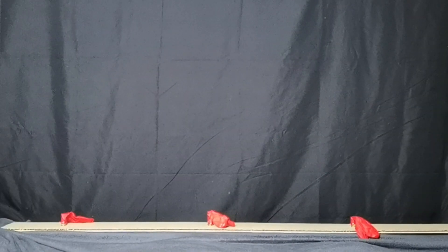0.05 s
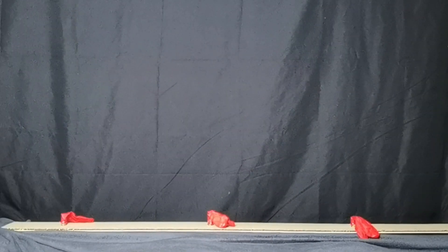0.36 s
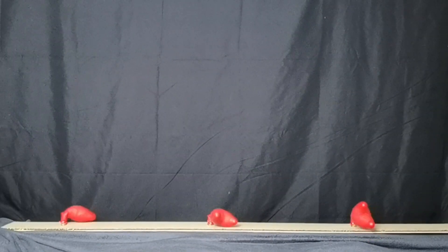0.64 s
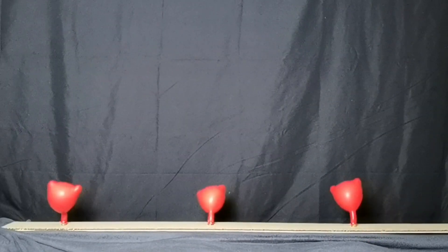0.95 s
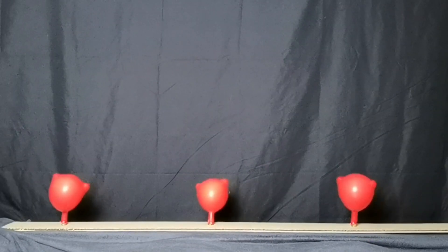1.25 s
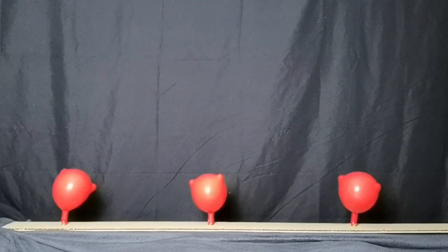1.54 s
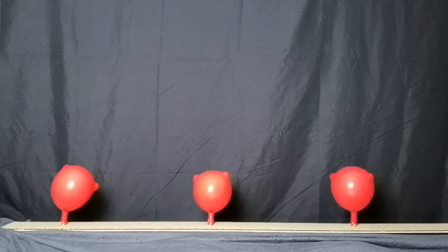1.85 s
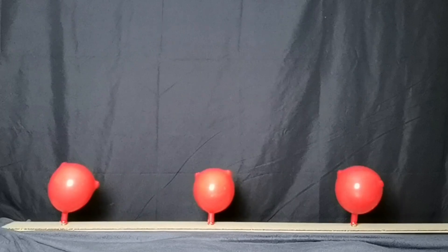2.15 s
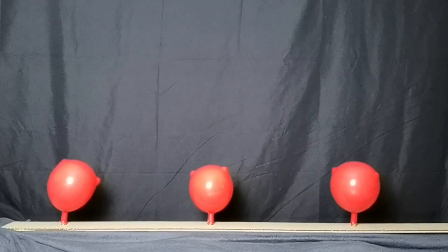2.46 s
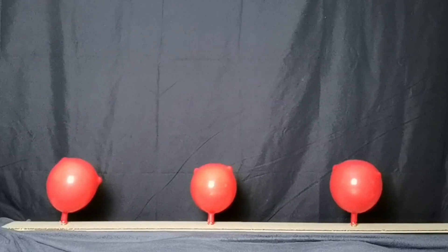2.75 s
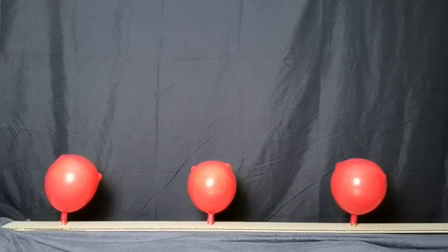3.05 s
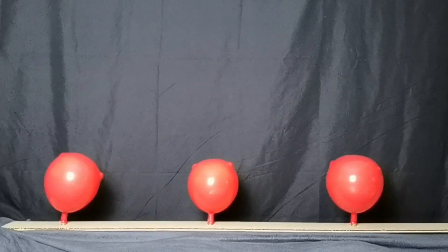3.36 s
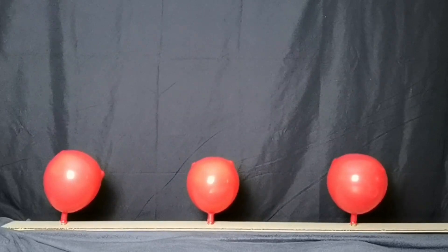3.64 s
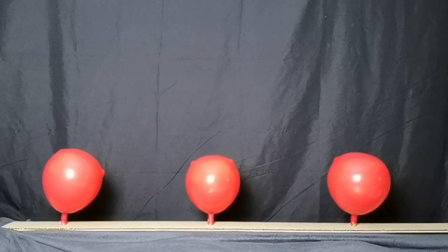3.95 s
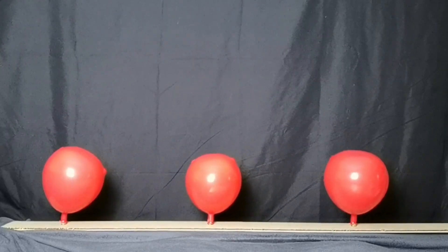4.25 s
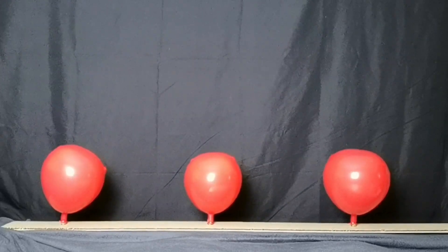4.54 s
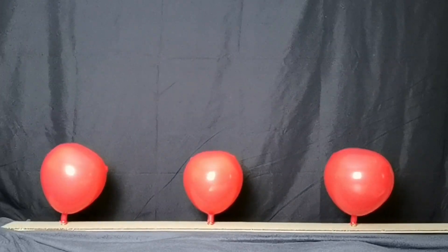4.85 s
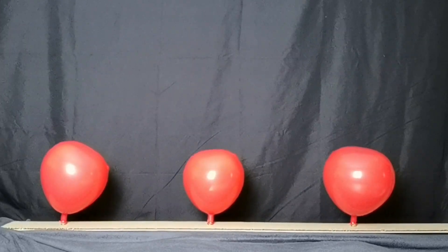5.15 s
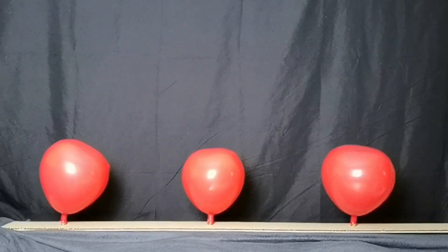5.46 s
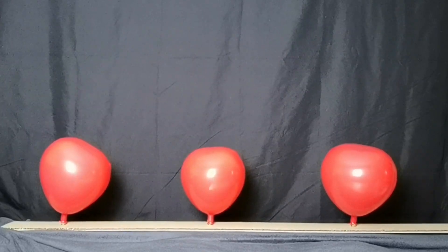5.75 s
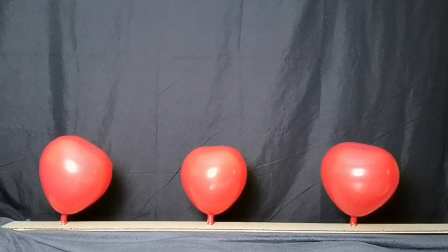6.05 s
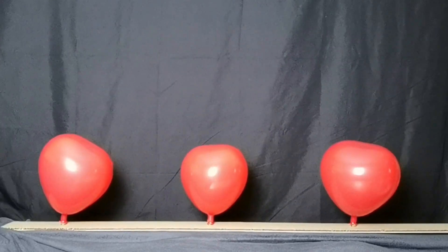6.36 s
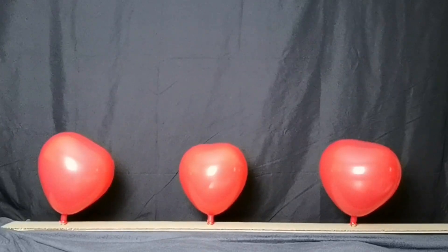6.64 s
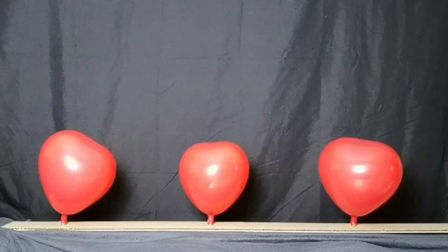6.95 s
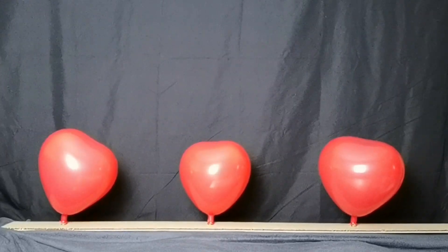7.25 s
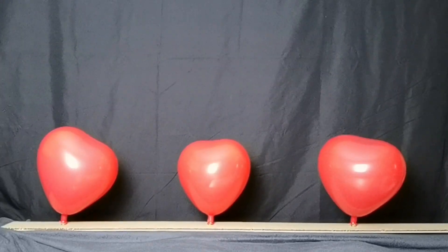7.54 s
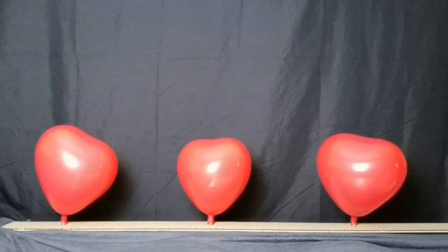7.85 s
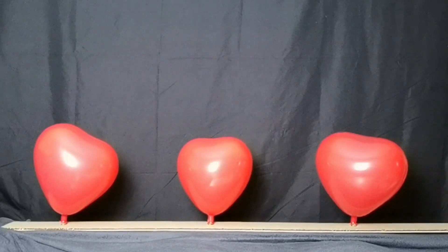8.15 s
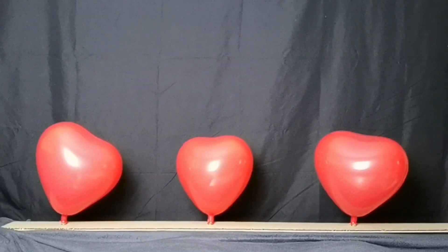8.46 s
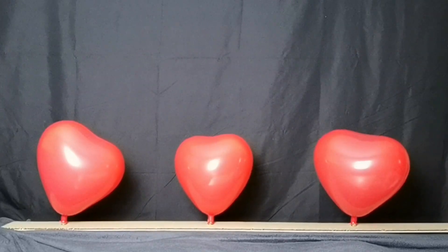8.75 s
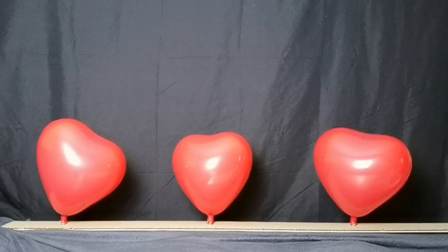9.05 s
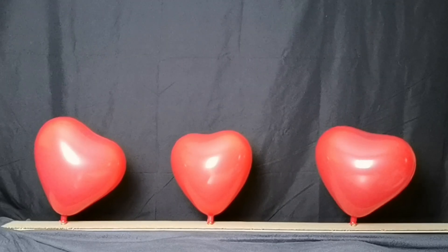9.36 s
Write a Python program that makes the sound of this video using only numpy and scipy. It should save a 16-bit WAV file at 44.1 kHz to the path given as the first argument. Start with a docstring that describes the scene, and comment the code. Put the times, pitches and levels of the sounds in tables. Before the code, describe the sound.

After a few light clicks, an electric air pump whines up to a steady pitch and fills three balloons with hissing air.

```python
"""An electric blower fills three balloons

After a few light clicks the switch snaps on, and the motor knocks, scrapes and runs up to a steady
whine over the hum of the mains. Air rushes through the housing and hisses out of three nozzles, each
singing a fuzzy note. The limp rubber crackles as it unfolds and thumps as it pulls taut in a quiet room."""
import sys
import numpy as np
from scipy import signal
from scipy.fft import rfft, irfft
from scipy.io import wavfile
from scipy.ndimage import uniform_filter1d

SR = 44100
rng = np.random.default_rng(int(sys.argv[2]) if len(sys.argv) > 2 else 0)


def generate_wav(sig):
    """Save sig (samples, or channels by samples) to the path in sys.argv[1] as 16-bit PCM at SR."""
    pcm = np.round(np.clip(np.atleast_2d(sig).T, -1, 1) * 32767).astype(np.int16)
    wavfile.write(sys.argv[1], SR, pcm)


N = 423360
TIME, FREQS = np.arange(N) / SR, np.fft.rfftfreq(N, 1 / SR)
SWITCH_ON_S, EAR_DELAY_S = 0.548, 22 / SR
SINCE_ON = np.maximum(TIME - SWITCH_ON_S, 0)

# narrow resonances (favoured pitches) of the hoses and nozzles: f/Hz, width/Hz, lift/dB
HOSE_PEAKS = [(493, 16, 4), (598, 20, 4.5), (675, 16, 2.5), (5410, 41, 2), (5624, 40, 4), (5895, 50, 3),
              (6010, 45, 3), (6235, 70, 4), (6420, 60, 2.5), (6530, 60, 2.5), (6730, 70, 1.5)]
HOSE_DB = sum(db / (1 + (2 * (FREQS - hz) / width) ** 2) for hz, width, db in HOSE_PEAKS)


def motor():
    """The spinning shaft sets the pitch of all the motor's tones, so they rise together."""
    speed = shaft_speed()
    unsteady = 1 + 0.000323 * wander(1.37) + 0.00022 * wander(4.5)
    angle = 2 * np.pi * np.cumsum(speed * unsteady) / SR
    lead = 2 * np.pi * speed * EAR_DELAY_S  # how far the left ear is ahead, in radians
    tones = whine(speed, angle, lead) + weak_tones(speed, angle, lead) + case_shake(speed, angle, lead)
    return (tones + brush_squeals(angle, lead)) * running()


def shaft_speed():
    """Turns per second: a quick kick at switch-on, a slower pull, then a creep as the motor warms."""
    # stages of the run-up: speed gained/Hz, time constant/s
    run_up = [(134.4, .0716), (212.2, .292), (4.45, 3)]
    return np.maximum(sum(gained * (1 - np.exp(-SINCE_ON / lag_s)) for gained, lag_s in run_up), 1)


def whine(speed, angle, lead):
    """The fan wheel makes four strong tones that swell and fade as they climb through resonances."""
    # each tone's order, meaning its cycles per turn of the shaft
    orders = [2, 4, 6, 14]
    # one row per order: left base level/dB, right base level/dB, growth/(dB per dB of speed),
    # twist (phase shift between the ears)/rad, waver/dB, roughness/rad
    fan_tones = [(-22, -22, 0.42, 0.03, 1.3, .038), (-39.5, -37, 1.5, -0.22, 1.7, 0.18),
                 (-34.5, -38, 3.7, 0.087, 1.2, .18), (-36, -44.5, 3.8, 0.2, 4, 0.85)]
    # each order drifts as the balloons grow: t/s, left lift/dB, right lift/dB, twist/rad
    drifts = {2: [(.8, 3.5, -0.5, -0.28), (1.05, 3, 3.5, -0.27), (1.22, 0, -3.5, 1.6),
              (1.43, 1, -0.5, -1.7), (1.56, -8, -4, 0.46), (1.75, 0.5, -0.5, 0.48),
              (1.97, -5.5, -4.5, 0.98), (2.15, 0, 2, 1.09), (3.4, -0.5, -1, 0.93), (3.55, -4.5, -4.5, 0.89),
              (3.8, 1, 0, 0.41), (4.2, -3.5, -0.5, 0.55), (4.55, -6, -2.5, 1.05), (4.85, 1.9, 0.5, 0.76),
              (6, 0.5, 1.5, 0.63), (7.5, -3, -3, 0.7), (8.2, 1.5, 1, 0.71), (9.1, 0.5, 0.5, 0.7)],
              4: [(1.1, 7, 4, -0.052), (1.18, 6, 4, -0.4), (1.24, 4, 3, 0.58), (1.3, 9, 3, 0.5),
              (1.35, 6, -1, -1.85), (1.42, 3.5, 5, -0.7), (1.55, 6, 1, -0.16), (1.9, 8.5, 2, -1.1),
              (2.3, -10, -5, -0.57), (2.9, -1, -0.5, 0.13), (3.75, -12, -9, -0.023), (4.55, -2, 1.5, 0.31),
              (5.6, -1, -1.5, 0.11), (7.3, -2, -3, 0.86), (7.75, -5, -3.5, 0.24), (8.3, 2.5, -0.5, 0.59),
              (9.4, -4, 0.5, -0.095)], 6: [(1.5, 0.5, 2, -0.4), (2, 1, 1, 1.5), (2.4, 4.3, 7.5, -0.1),
              (3.05, 5, 9, -0.6), (4.1, 2.5, 7, -0.1), (4.5, 3, -1, 0.6), (5.6, -3, -1, 0.7),
              (6.5, 2.5, 5.5, -1.1), (7.6, -1.5, -4, 1), (8.5, 3, -2, 0.7), (9.4, -0.5, 5, 1.7)],
              14: [(.95, -1, 4, -1.4), (1.12, -2, -4, -1.4), (1.23, 8, -3, -1.4), (1.32, -2, 5, -2),
              (1.6, 2, 5, -2), (2.5, -1.5, -3, -0.12)]}
    speed_db = 20 * np.log10(speed / speed[-1])
    out = np.zeros((2, N))
    for order, (left_db, right_db, growth, twist, waver_db, rough_rad) in zip(orders, fan_tones):
        hz = order * speed
        *drift_db, drift_twist = curve(drifts[order])
        ripple_db, ripple_twist = standing_waves(hz)
        level_db = np.array([[left_db], [right_db]]) + growth * speed_db
        level_db += resonance_db(hz) + ripple_db + drift_db
        ear_phase = order * lead + twist + drift_twist + ripple_twist
        radiated = 1 / (1 + (285 / hz) ** 12)  # the small case gives off no low tones
        out += radiated * tone(order * angle, level_db, ear_phase, waver_db, rough_rad)
    return out


def resonance_db(pitch):
    """The housing and the room boost some pitches and swallow others, differently at each ear."""
    # peaks and dips: f/Hz, half width/Hz, left lift/dB, right lift/dB
    peaks = [(322, 20, 4.5, 0), (359, 14, -15, -18), (390, 18, -2, -3), (439, 10, -4, -22),
             (468, 18, 5.5, -3), (496, 13, 6, 5), (510, 8, 5.5, -4), (526, 4, -7, 2), (539, 4, -19, -12),
             (552, 6, -16, -4), (567, 5, -7, -18), (578, 5, -0.5, -2), (590, 7, -12, -5), (600, 4, 3, -18),
             (615, 14, 2.5, 2.5), (647, 3, -4, 0), (656, 5, 4.5, -2), (665, 4.5, -11, -18), (930, 55, 5, 0),
             (1268, 40, 13.5, 12), (1306, 5, -8, -1), (1318, 4, -8, -7), (1338, 14, 7.5, 7),
             (1354, 2, -11, -7), (1363, 4, 5, 2), (1371, 3, -7, -3), (1790, 75, 5.5, 1), (1975, 50, -6, -5),
             (2058, 18, 6.5, 10.5), (4100, 90, 5, 5)]
    lifts = sum(np.outer([left, right], bump(pitch[::64], hz, width)) for hz, width, left, right in peaks)
    return np.array([np.interp(TIME, TIME[::64], lift) for lift in lifts])


def standing_waves(hz, depth_db=0.9, depth_rad=0.25, spacing_hz=14):
    """Standing waves ripple a rising tone's level and phase; the ripple ends near its final pitch."""
    steps = (hz[-1] - hz) / spacing_hz
    ripple = rng.standard_normal((3, 1024))
    ripple[:, :2] = 0
    left, right, twist = (np.interp(steps, np.arange(len(row)), row) for row in ripple)
    return depth_db * np.array([left, right]), depth_rad * twist


def weak_tones(speed, angle, lead):
    """Quieter tones grow with speed; those that are not whole orders come from the bearings."""
    # tones at full speed: order/(cycles per turn), left level/dB, right level/dB, twist/rad
    orders = [(3, -45.5, -47.5, -0.2), (4.78, -58, -54.5, 0), (5.22, -44.8, -45.6, 1.4),
              (6.78, -54, -54, 0), (8, -50.5, -46.8, -1.4), (10, -46.3, -46.5, 0.5)]
    out = np.zeros((2, N))
    for order, left_db, right_db, twist in orders:
        level_db = np.array([[left_db], [right_db]])
        out += tone(order * angle, level_db, order * lead + twist, waver_db=3.0, rough_rad=0.13)
    return out * (speed / speed[-1]) ** 3


def case_shake(speed, angle, lead, resonance_hz=212, half_width_hz=25, level_db=-43):
    """The slightly lopsided shaft shakes the case as its speed passes the case's resonance."""
    shake = tone(angle, level_db, lead, waver_db=2.0, rough_rad=0.3)
    return bump(speed, resonance_hz, half_width_hz) * shake


def brush_squeals(angle, lead, bars=24, fray_rad=1.3, right_db=-1.5):
    """The brushes, which feed current to the shaft, squeal briefly on its spinning contact bars."""
    # squeals: t/s, half length/s, level/dB
    squeals = [(.582, .011, -33), (.65, .01, -29.5), (.68, .013, -33)]
    phase = bars * angle + fray_rad * wander(240)
    squeal = tone(phase, np.array([[0], [right_db]]), bars * lead, waver_db=1.0, rough_rad=0.6)
    return reverberate(swells(squeals) * squeal * running(), t60=0.21, wet_db=-1)


def brush_rasp():
    """The brushes scrape and spark under the heavy starting current."""
    # tone colour of the scrape: f/Hz, relative level/dB
    colour = [(850, 0), (1050, -3), (1400, -5.5), (1800, 5), (2200, -14), (3200, -13), (4100, -11),
              (4800, 0)]
    # bursts of scraping: t/s, half length/s, level/dB
    bursts = [(0.573, 0.031, -40), (0.742, 0.069, -25.5), (0.927, 0.038, -43.5), (1.13, 0.22, -31.5)]
    scrape = evened(coloured(rng.standard_normal((2, N)), colour, skirt_db=41))
    flicker_db = 2 * wander(60) + [[0], [-2]]  # a little softer on the right
    return scrape * swells(bursts) * gain_of(flicker_db) * running()


def knock():
    """The motor kicks against its housing as the current comes on, and the shell rings briefly."""
    # kicks: t/s, level/dB
    kicks = [(0.5497, -35), (0.599, -39)]
    # ringing notes of the housing: f/Hz, relative level/dB, time to fade by 60 dB/s
    housing = [(293, -2, 0.09), (490, 1, 0.12), (934, -1, .13), (1810, -7, .06), (2132, -8, .06)]
    out = np.zeros((2, N))
    for start_s, db in kicks:
        part = out[:, round(start_s * SR):][:, :SR // 4]
        t = TIME[:part.shape[1]]
        for hz, note_db, t60 in housing:
            part += gain_of(db + note_db - 60 * t / t60) * np.sin(2 * np.pi * hz * t)
    return reverberate(out, t60=0.15, wet_db=-3)


def hum(hz=100, steady_db=-45.5, surge_db=10, surge_s=0.75):
    """The motor's iron hums at twice the mains frequency, louder while the starting current flows."""
    # the hum dips briefly: t/s, half length/s, level change/dB
    dips = [(0.62, 0.013, -19), (0.814, 0.068, -10)]
    dips_db = sum(db * bump(TIME, s, half_s) for s, half_s, db in dips)
    level_db = steady_db + surge_db * bump(SINCE_ON, 0, surge_s) + dips_db
    return tone(2 * np.pi * hz * TIME, level_db, np.zeros(N), waver_db=2.5, rough_rad=0.13) * running()


def airflow():
    """Moving air makes a low rumble, a middle rush and a high hiss."""
    # slow rise and fall of the low air noise: t/s, relative level/dB
    low_air = [(1.1, 0), (1.48, 1.5), (2.1, -4), (3, -5), (4, 1.5), (4.6, 1.5), (6.8, 0.5), (7.6, -5),
               (8.3, 1), (9.1, -7)]
    low_db = curve(low_air)[0]
    low_db -= np.median(low_db)
    return (rumble(low_db) + rush(low_db) + hiss()) * running()


def rumble(low_db):
    """The shaking case gives off a deep noise."""
    # tone colour: f/Hz, left base level/dB per Hz, right base level/dB per Hz
    colour = [(25, -82, -85), (45, -94, -94), (66.5, -61, -67), (85.5, -81.5, -86), (128, -67, -70),
              (221, -70.5, -72.5), (227, -64.5, -64), (264, -74, -73.5), (286, -64.5, -72),
              (382, -77, -73.5)]
    level_db = flow_db(steady_db=1.26, growth=0.19, extra_db=9.2, settle_s=0.087) + 0.57 * low_db
    return air_noise(colour, skirt_db=70) * gain_of(level_db + wander(9.5))


def rush(low_db):
    """Air swirls through the blower and swells as the balloons open."""
    # tone colour: f/Hz, left base level/dB per Hz, right base level/dB per Hz
    colour = [(382, -68.5, -82), (446, -60, -64.5), (488, -61, -63.5), (514, -64, -70), (636, -62, -70),
              (758, -61, -69.5), (782, -71, -81), (840, -92, -78), (898, -64, -72), (963, -73, -71.5),
              (1200, -63.5, -68.5), (1250, -63.5, -70), (1734, -72.5, -75), (2160, -63, -65),
              (2820, -63, -65.5), (3300, -67, -66.5), (4130, -65.5, -69.5)]
    # the swell: t/s, half length/s, lift/dB
    gusts = [(0.94, 0.11, 5.5)]
    noise = air_noise(colour, skirt_db=23)
    noise = flicker(noise, patchy_db=1.0, shared_db=0.84, flicker_hz=3130, width_hz=350, boost=2.6)
    low, high = split(noise, hz=1150)
    gust_db = sum(db * bump(TIME, s, half_s) for s, half_s, db in gusts)
    level_db = flow_db(steady_db=0.03, growth=0.8, extra_db=3.5, settle_s=1) + gust_db
    return (low * gain_of(0.53 * low_db) + high) * gain_of(level_db)


def hiss(spits_per_s=45):
    """Air jets hiss out of the nozzles, with tiny spits at random moments."""
    # tone colour: f/Hz, left base level/dB per Hz, right base level/dB per Hz
    colour = [(4880, -59.5, -58.5), (5160, -60.5, -66.5), (5320, -53.5, -55.5), (5650, -56, -57.5),
              (6640, -54, -63), (7000, -54.5, -65), (7730, -57, -62.5), (8470, -53.5, -69),
              (10410, -57, -73.5), (11150, -61, -74), (11360, -68, -92), (13100, -61.5, -80),
              (15000, -69.5, -88.5), (15700, -82.1, -99.7)]
    noise = flicker(air_noise(colour, skirt_db=38.5), patchy_db=0.88, shared_db=0.33)
    level_db = flow_db(steady_db=-0.48, growth=2, extra_db=2.5, settle_s=1.54)
    spits = rng.exponential(1, N) * (rng.random(N) < spits_per_s / SR)
    spits = signal.oaconvolve(np.minimum(spits, 3), np.hanning(80), "same")
    return noise * gain_of(level_db) * (1 + 0.072 * spits)


def flow_db(steady_db, growth, extra_db, settle_s):
    """Air noise grows with shaft speed (growth in dB per dB); an extra lift at the start dies away."""
    speed = shaft_speed()
    return steady_db + growth * 20 * np.log10(speed / speed[-1]) + extra_db * np.exp(-SINCE_ON / settle_s)


def flicker(x, patchy_db, shared_db, flicker_hz=6000, width_hz=1300, boost=1.0):
    """Patches of the noise flicker in loudness, most near flicker_hz, and all of it wavers."""
    hz, _, frames = signal.stft(x, SR, nperseg=256)
    patches = uniform_filter1d(rng.standard_normal(frames.shape[1:]), size=7, axis=0)
    patches = evened(uniform_filter1d(patches, size=9, axis=1))
    depth_db = patchy_db * (1 + boost * bump(hz[:, None], flicker_hz, width_hz))
    flickering = signal.istft(frames * gain_of(depth_db * patches), nperseg=256)[1][:, :N]
    return flickering * gain_of(shared_db * wander(7.8))


def nozzle_notes(swing_hz=260, wobble_hz=22, fuzz_hz=130, waver_db=4.1, right_db=-18):
    """Once pressure builds, each nozzle's jet sings a fuzzy, wobbling note, coloured by the hoses."""
    # one note per nozzle: f/Hz, base level/dB
    nozzles = [(5850, -31.5), (6150, -29.5), (6400, -30)]
    notes = np.zeros(N)
    for hz, db in nozzles:
        angle = 2 * np.pi * np.cumsum(hz + swing_hz * wander(wobble_hz)) / SR
        fuzzy = wander(fuzz_hz) * np.cos(angle) + wander(fuzz_hz) * np.sin(angle)
        notes += fuzzy * gain_of(db + waver_db * wander(wobble_hz))
    speed = shaft_speed()
    pressure = np.clip((TIME - 0.58) / 0.14, 0, 1)  # builds just after switch-on
    left = rfft(notes * (speed / speed[-1]) ** 0.38 * pressure) * gain_of(HOSE_DB)
    right = left * gain_of(right_db) * np.exp(-2j * np.pi * FREQS * EAR_DELAY_S)
    return reverberate(irfft(np.array([left, right]), N), t60=0.046, wet_db=-5) * running()


def unfolding(from_s=0.66, to_s=1.22, base_db=-32, spread_db=7, t60=0.045, count=26):
    """The limp balloons flick open in a scatter of rubbery snaps."""
    return snaps([(from_s + (to_s - from_s) * when, base_db + spread_db * size, t60, 0)
                  for when, size in rng.random((count, 2))])


def thumps():
    """The rubber skins pull taut and push the air in soft, low thumps."""
    # thumps: t/s, half length/s, level/dB
    pulls = [(1.335, 0.023, -40), (1.49, .018, -47), (1.553, 0.02, -37)]
    # their tone colour: f/Hz, relative level/dB
    colour = [(30, -8), (55, 2), (150, -8), (240, -7)]
    return evened(coloured(rng.standard_normal(N), colour, skirt_db=18)) * swells(pulls)


def clicks():
    """Handling makes clicks and rattles, then the switch closes and the rubber first snaps."""
    # clicks: t/s, base level/dB, time to fade by 60 dB/s, treble lift/dB
    hits = [(.126, -55, .03, -4), (.171, -62, .05, 0), (.183, -53, .04, -4), (.3015, -39.5, 0.018, -3),
            (.312, -47, .012, -4), (.318, -54, 0.12, 0), (.395, -42.5, .02, -9), (.409, -58, .03, -6),
            (.43, -50, .02, -2), (.474, -71, 0.035, -10), (.55, -31.5, 0.016, 2), (.595, -29, .008, 12),
            (.603, -33, 0.0099, 12)]
    return snaps(hits)


def snaps(rows):
    """Each snap is a fast-fading burst of noise that sounds like thin plastic."""
    # tone colour of the plastic: f/Hz, lift/dB
    plastic = [(60, -4), (300, 2), (700, -9), (1200, 1), (1900, 9), (2600, 7), (3800, -6), (6000, -6),
               (10000, -9), (15000, -37)]
    out = np.zeros((2, N))
    for start_s, db, t60, treble_db in rows:
        part = out[:, round(start_s * SR):][:, :SR // 8]
        t = TIME[:part.shape[1]]
        noise = rng.standard_normal(len(t)) + 1.64 * rng.standard_normal(part.shape)  # shared + per ear
        body, treble = split(noise, hz=4030)
        part += (body + gain_of(treble_db) * treble) * gain_of(db - 60 * t / t60)
    return coloured(out, plastic)


def faint_squeak(at_s=0.077, half_s=0.033, hz=1175, level_db=-64):
    """Something squeaks faintly before the start."""
    phase = 2 * np.pi * hz * TIME + 1.1 * wander(70)
    return gain_of(level_db) * bump(TIME, at_s, half_s) * np.sqrt(2) * np.cos(phase)


def room_noise():
    """The quiet room adds a faint, steady noise."""
    # tone colour: f/Hz, left base level/dB per Hz, right base level/dB per Hz
    colour = [(25, -96, -92), (100, -82, -85), (300, -89, -91), (700, -99.5, -101), (2200, -100, -99),
              (4000, -109, -110), (6000, -106, -108), (10100, -113, -116), (14000, -128, -131)]
    return air_noise(colour, skirt_db=12)


def air_noise(colour, skirt_db, ripple_db=2.4, ripple_hz=28):
    """Noise with the hoses' peaks: part reaches the left ear first, the rest comes from all around."""
    # the part that comes straight from the blower: f/Hz, share/(0 to 1)
    direct_share = [(60, 0.7), (300, 0.85), (480, 0.32), (750, 0.69), (950, 0.54), (1500, 0.92),
                    (2300, 0.52), (5000, 0.23), (9000, 0.05), (15000, 0.2)]
    direct = np.clip(spectrum(direct_share)[0], 0, 1)
    delay = np.exp(-2j * np.pi * FREQS * EAR_DELAY_S)
    likeness = direct * delay + (1 - direct) * np.sinc(2 * FREQS * 0.00019)  # of the two ears
    left, other = rfft(rng.standard_normal((2, N)))
    right = likeness * left + np.sqrt(np.maximum(1 - abs(likeness) ** 2, 0)) * other
    # reflections cut fine peaks and dips, like a comb, mostly from 900 to 5000 Hz
    teeth = rng.standard_normal((2, 2048))
    comb = np.array([np.interp(FREQS / ripple_hz, np.arange(len(row)), row) for row in teeth])
    comb *= FREQS / (FREQS + 900) / (1 + (FREQS / 5000) ** 2)
    level_db = spectrum(colour, skirt_db) + HOSE_DB + ripple_db * comb
    return irfft(np.array([left, right]) * gain_of(level_db), N) * np.sqrt(SR / 2)


def reverberate(x, t60, wet_db):
    """Adds the room's dense echoes, different at each ear, fading by 60 dB in t60 seconds."""
    t = TIME[:SR // 2]
    tail = rng.standard_normal((2, len(t))) * gain_of(-60 * t / t60) * (t > .004)
    return x + gain_of(wet_db) * signal.fftconvolve(x, tail / np.linalg.norm(tail[0]), axes=1)[:, :N]


def tone(angle, level_db, lead, waver_db, rough_rad):
    """One motor tone at both ears; swirling air makes its level waver and its pitch rough."""
    phase = angle + rough_rad * wander(29) + np.array([lead, -lead]) / 2
    return np.sqrt(2) * gain_of(level_db + waver_db * wander(19)) * np.cos(phase)


def running():
    """Zero until the switch closes, then quickly up to one."""
    return np.clip((TIME - SWITCH_ON_S) / 0.0053, 0, 1)


def wander(rate_hz):
    """A smooth random wobble of typical size one, up to about the given rate."""
    coarse = TIME[::64]
    hz = np.fft.rfftfreq(len(coarse), coarse[1])
    slow = irfft(rfft(rng.standard_normal(len(coarse))) / (1 + (hz / rate_hz) ** 4), len(coarse))
    return np.interp(TIME, coarse, evened(slow))


def bump(x, centre, half_width):
    """A bell shape of height one."""
    return np.exp(-((x - centre) / half_width) ** 2)


def swells(rows):
    """A loudness curve with one bell shape per row."""
    return sum(gain_of(db) * bump(TIME, s, half_s) for s, half_s, db in rows)


def curve(rows):
    """Joins the points of a time table with straight lines."""
    s, *columns = np.transpose(rows)
    return np.array([np.interp(TIME, s, c) for c in columns])


def spectrum(rows, skirt_db=0):
    """Joins the points of a frequency table; past its ends the values fall by skirt_db an octave."""
    hz, *columns = np.transpose(rows)
    octave, known = np.log2(FREQS + 1), np.log2(hz)
    outside = abs(octave - np.clip(octave, known[0], known[-1]))
    return np.array([np.interp(octave, known, c) for c in columns]) - skirt_db * outside


def coloured(x, colour, skirt_db=0):
    """Filters a sound to give it a table's tone colour."""
    return irfft(rfft(x) * gain_of(spectrum(colour, skirt_db)), N)


def split(x, hz):
    """The parts below and above a frequency."""
    low = signal.sosfiltfilt(signal.butter(2, hz, fs=SR, output="sos"), x)
    return low, x - low


def gain_of(db):
    """Turns decibels into a multiplier."""
    return 10 ** (np.asarray(db) / 20)


def evened(x):
    """Scales a signal to a typical size (rms) of one."""
    return x / np.sqrt(np.mean(x ** 2) + 1e-20)


def scene():
    """Blower, balloons and room together."""
    small_sounds = reverberate(clicks() + unfolding(), t60=0.2, wet_db=-2) + faint_squeak()
    blower = knock() + motor() + brush_rasp() + hum() + airflow() + nozzle_notes()
    return blower + thumps() + small_sounds + room_noise()


def record(dry):
    """Cuts off the highest treble."""
    lowpass = signal.firwin(1023, 15780, window=("kaiser", 9), fs=SR)
    return signal.oaconvolve(dry, lowpass[None], "same")


dry = scene()
out = record(dry)
generate_wav(out)
```